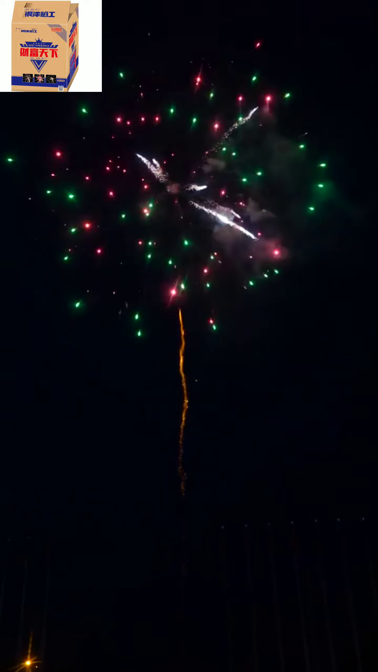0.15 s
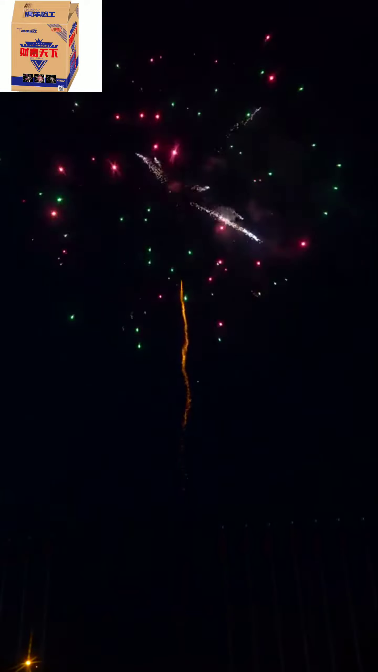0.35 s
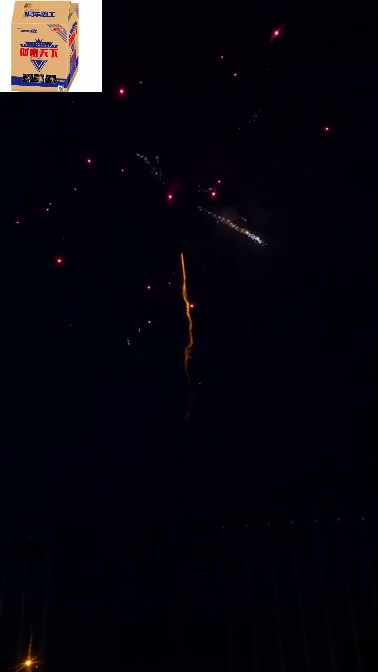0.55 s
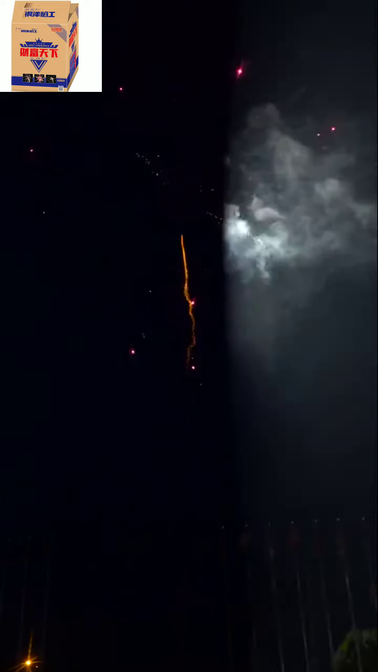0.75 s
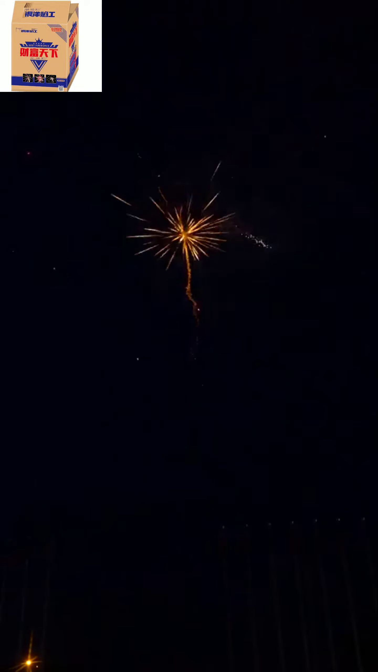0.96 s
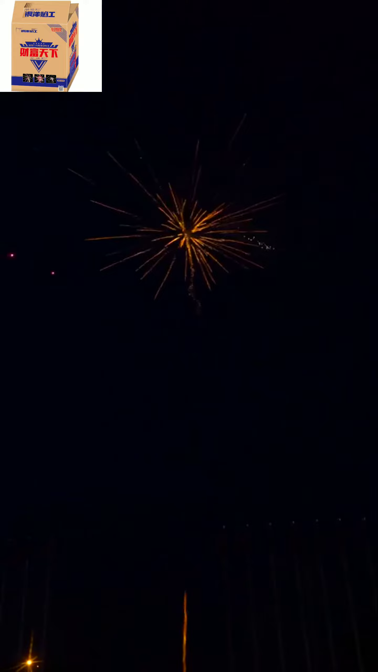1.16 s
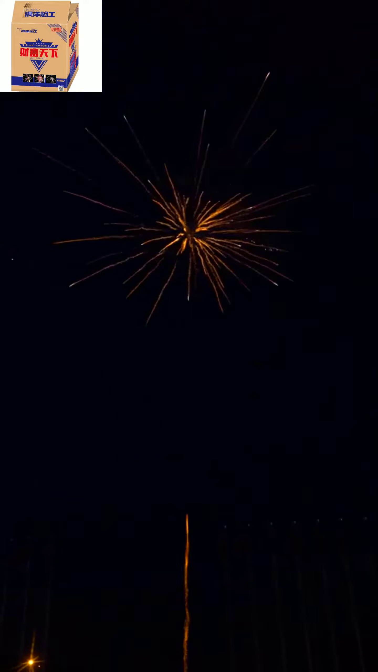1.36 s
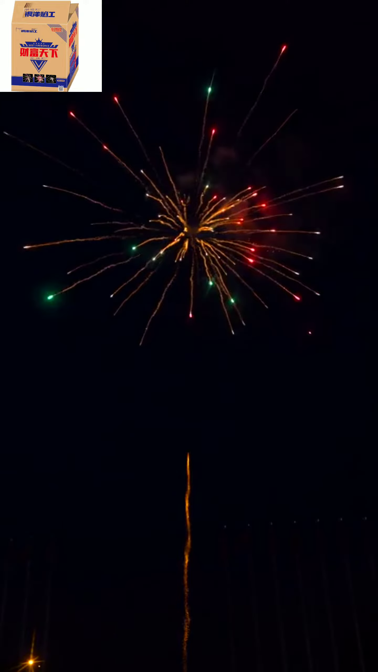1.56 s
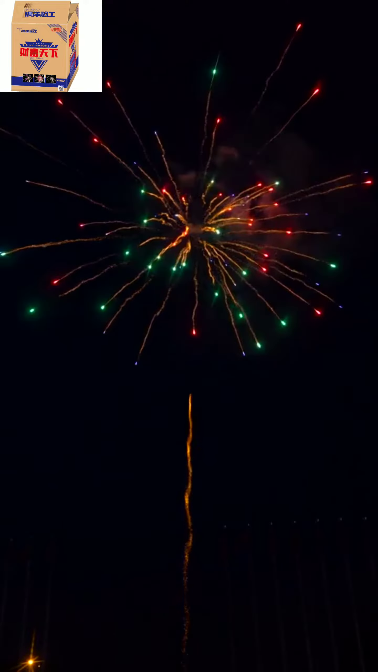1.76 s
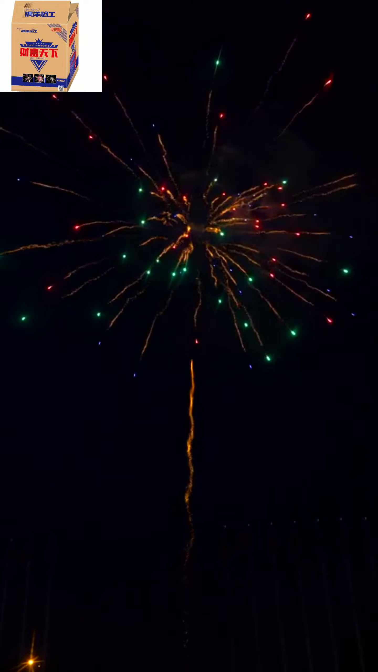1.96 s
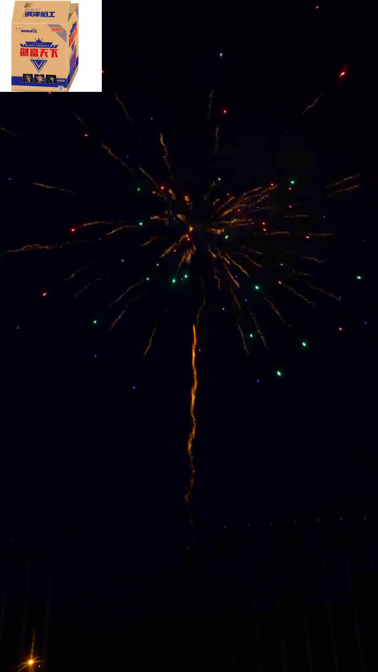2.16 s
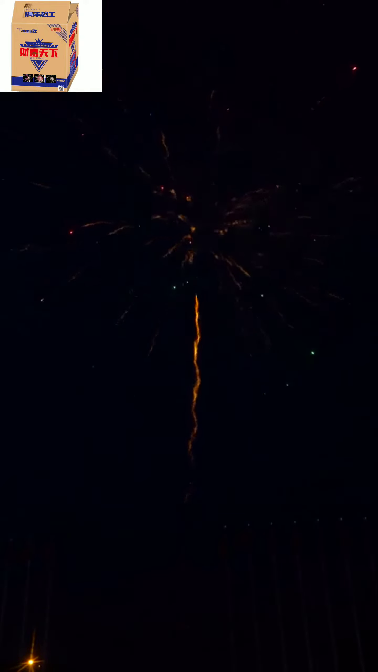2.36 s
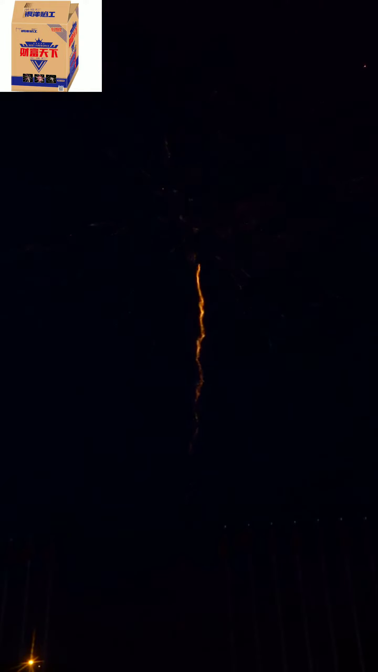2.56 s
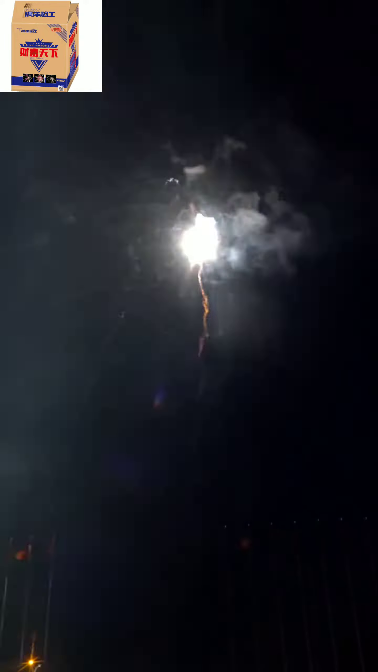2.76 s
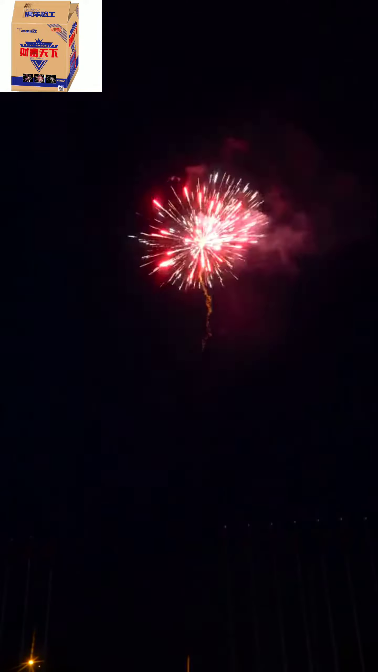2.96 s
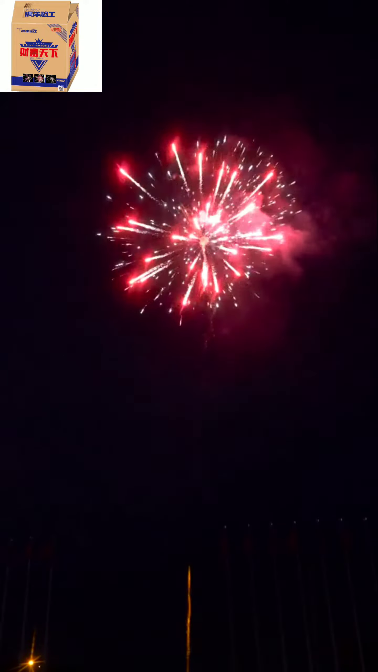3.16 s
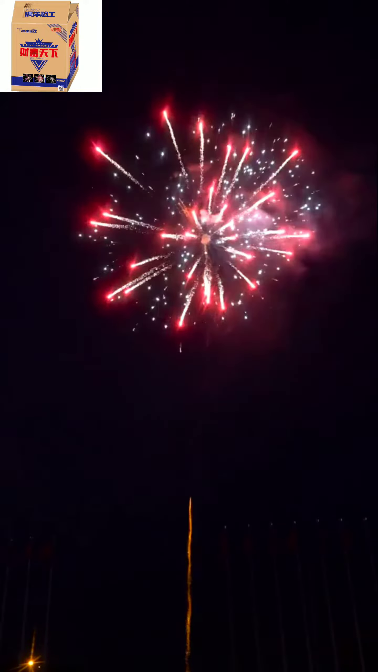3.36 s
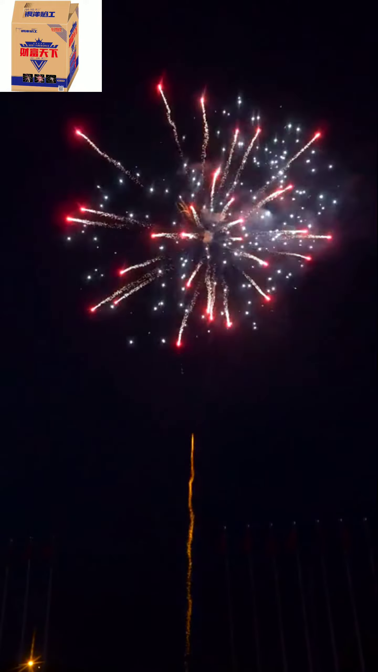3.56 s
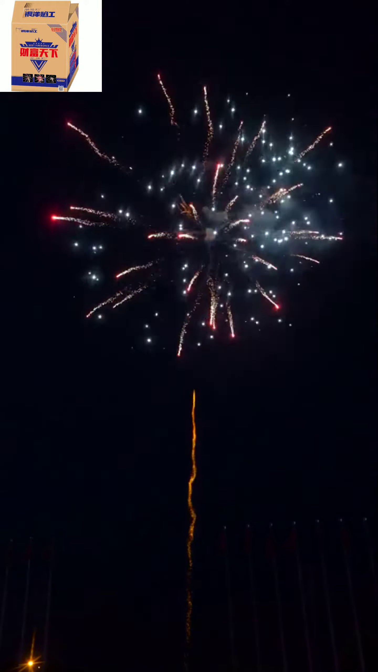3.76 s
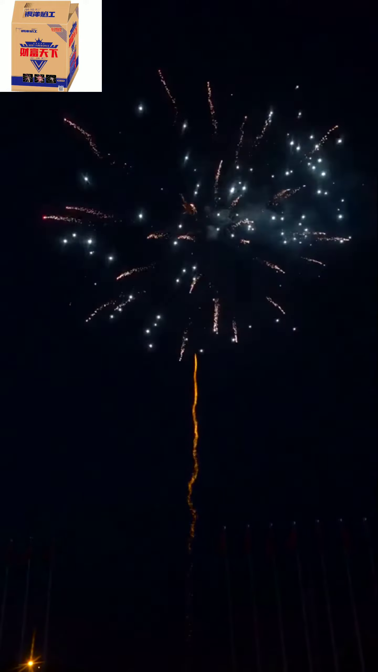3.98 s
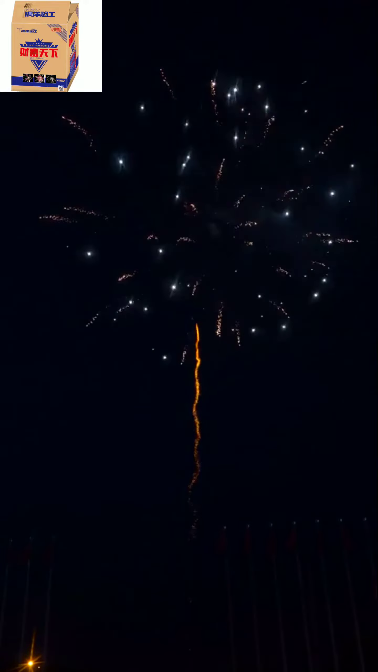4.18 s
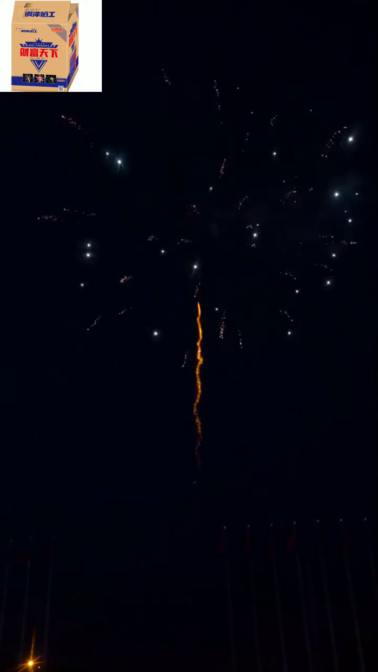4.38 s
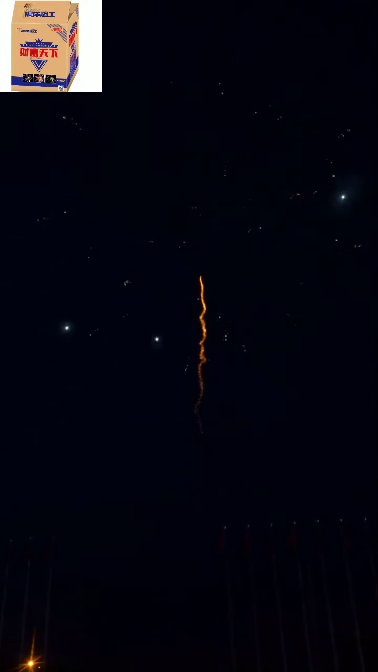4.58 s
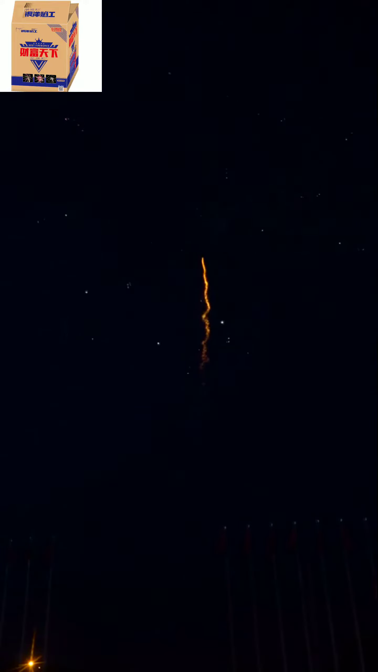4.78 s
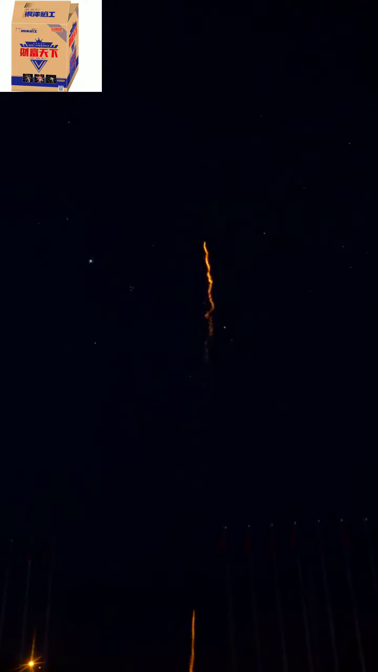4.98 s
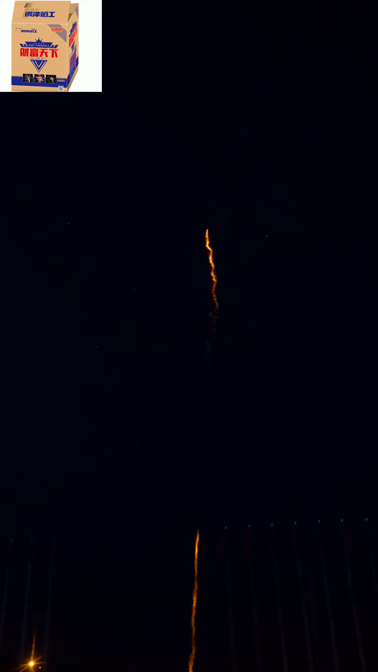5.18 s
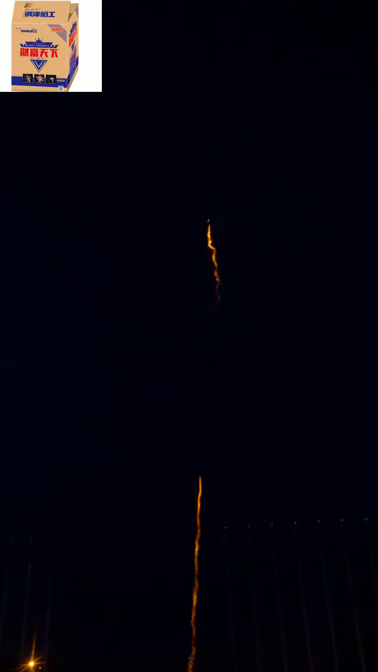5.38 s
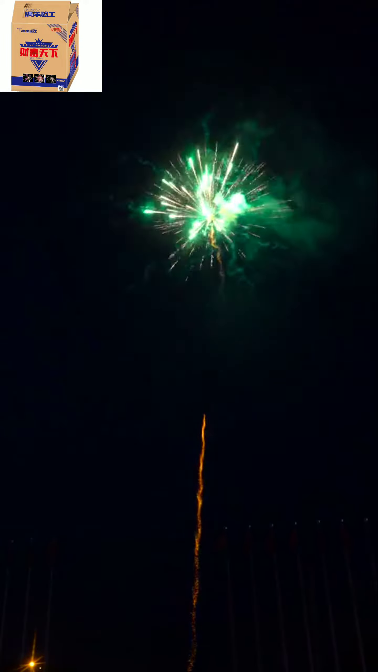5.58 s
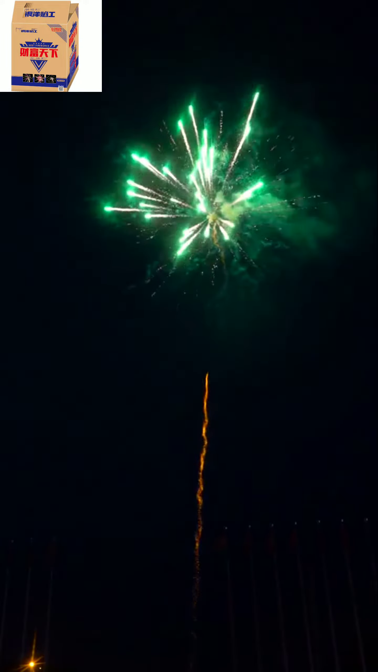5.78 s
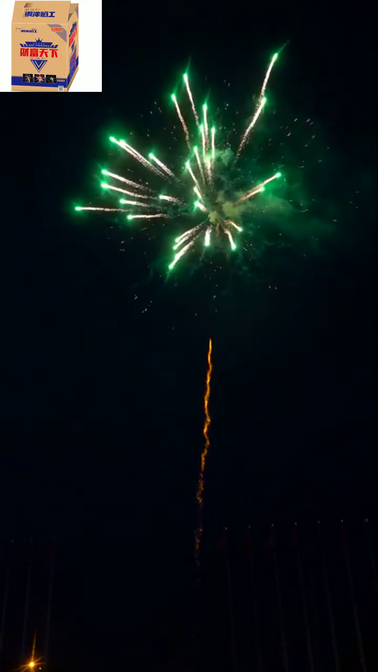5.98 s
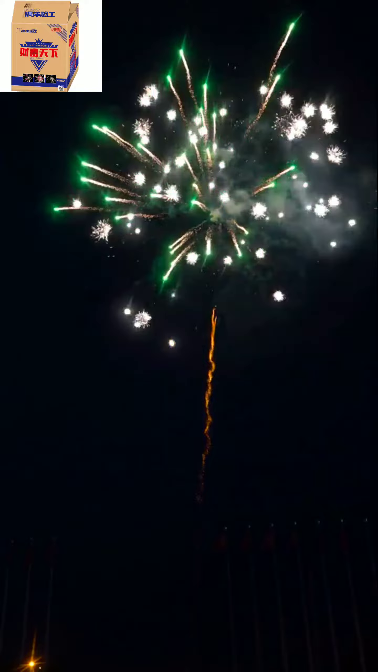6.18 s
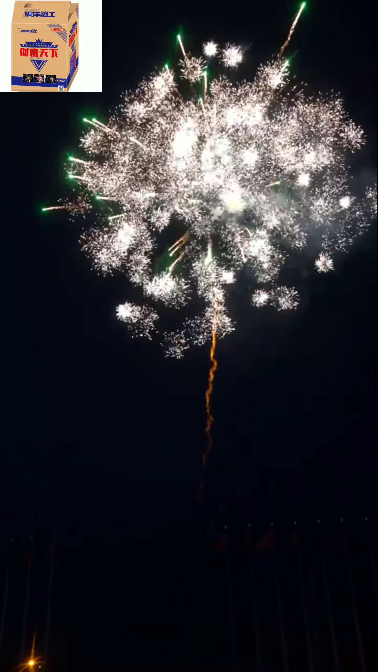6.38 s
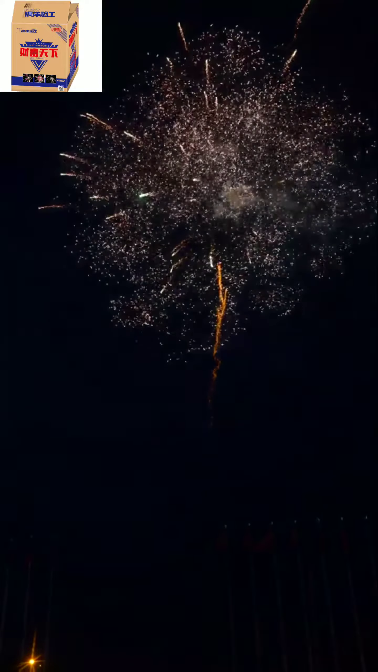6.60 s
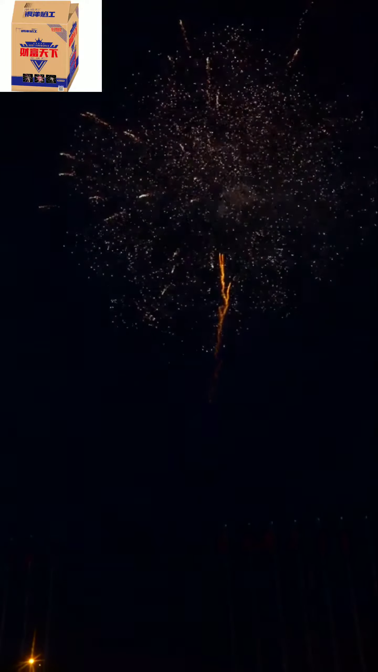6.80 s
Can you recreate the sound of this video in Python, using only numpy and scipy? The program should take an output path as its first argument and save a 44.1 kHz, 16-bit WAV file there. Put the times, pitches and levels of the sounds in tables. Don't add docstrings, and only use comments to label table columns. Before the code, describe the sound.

Three firework shells launch and burst at night, each double bang slapping off house fronts and rolling away, the last ending in crackling stars.

```python
import sys
import numpy as np
from scipy import signal
from scipy.fft import rfft, irfft, next_fast_len
from scipy.io import wavfile
from scipy.ndimage import uniform_filter1d

SR = 44100
rng = np.random.default_rng(int(sys.argv[2]) if len(sys.argv) > 2 else 0)


def store_wav(level_fs):
    pcm = np.round(np.clip(np.atleast_2d(level_fs), -1, 1) * 32767)
    wavfile.write(sys.argv[1], SR, pcm.T.astype(np.int16))


def volts_from_decibels(level):
    exponent = np.asarray(level, float) / 20
    return 10 ** exponent


N = 301628
M = next_fast_len(N)
T, HZ = np.arange(N) / SR, np.fft.rfftfreq(M, 1 / SR)

# (time [s], firing rate [Hz], level [dB])
ENGINE = [(0, 76.5, -38), (1.05, 79, -35.5), (2, 82, -39), (2.97, 84.6, -38), (4.2, 88, -40),
          (4.55, 88.9, -49), (4.7, 89.4, -40), (5.35, 91.2, -39), (5.55, 91.6, -48), (6.84, 93, -43)]
# (frequency [Hz], density [dB per Hz])
NIGHT_COLOUR = [(12, -43), (20, -33), (38, -19), (62, 2), (92, -16.5), (129, 6.5), (307, -10), (479, -25),
                (591, -22), (1230, -19), (5080, -46.5), (8150, -43.5), (10600, -69.5), (13800, -110),
                (22000, -120)]
# (frequency [Hz], side against mid [dB])
WIDTH = [(60, -33), (125, -44.5), (250, -21.5), (500, -9), (1000, -8.5), (2000, -1.5), (4000, 1),
         (8000, -9), (10500, -24)]
# (low edge [Hz], high edge [Hz])
ROLL_BANDS = [(100, 450), (450, 1700), (1700, 5000), (5000, 10000)]
# (frequency [Hz], density [dB per Hz])
ROLL_COLOUR = [(15, -45), (25, -30.5), (41, -29.5), (103, -8.5), (270, -3.5), (483, -14), (521, -10.5),
               (689, -7.5), (933, -10), (1260, -15), (2630, -31.5), (7440, -44), (8880, -48.5), (9820, -63),
               (10600, -75), (13800, -99), (22000, -120)]
# (time [s], strength [dB], brightness [dB], stretch [ratio])
BURST_ROLLS = [
    (-0.47, 1, -0.5, 1.094),
    (1.0916, -0.5, 0.14, 0.99),
    (3.0739, 0.73, 0.3, 0.97),
    (5.7036, 0.72, 1.15, 0.95),
]
# (time [s], strength [dB], brightness [dB], stretch [ratio])
LIFT_ROLLS = [
    (1.0678, -0.5, 3.5, 0.63),
    (3.0001, -1, 1, 1.01),
    (4.9582, -0.5, 2.5, 0.89),
]
# (age [s], boom [dB], left-right [dB])
BURST_ECHO = [(0, -26.5, -1), (0.043, -14, 1.5), (0.085, -17.5, -3), (0.122, -15, -3.5), (0.23, -15, -3),
              (0.31, -18.5, -2), (0.45, -24.5, -1.5), (0.749, -30, 0), (1.3, -43, -0.5)]
# (age [s], boom [dB], left-right [dB])
LIFT_ECHO = [(0, -27.5, 8.5), (0.055, -27.5, 6.5), (0.1, -27.5, -4.5), (0.14, -25.5, -5), (0.2, -24, -5),
             (0.31, -30.5, -3.5), (0.4, -34.5, -1.5), (0.5, -37, 0), (0.75, -41, 0.5)]
# (share [dB], extra while young [dB], dulling [dB/s], share of brightness [ratio], far murmur [dB])
BURST_AGEING = [
    (-0.35, -2.6, 0.6, 0.37, -42),
    (-12, 4.5, 1, 0.85, -53),
    (-19.5, 8, -2.9, 0.9, -64.5),
    (-21.5, 6, 15.5, 1.7, -90.5),
]
# (share [dB], extra while young [dB], dulling [dB/s])
LIFT_AGEING = [
    (0.4, 0, 3.2),
    (-10.5, 4.5, -0.7),
    (-14, 9.5, -3.5),
    (-20.5, -3.5, 19.5),
]
# (delay [s], peak [dB], centre [Hz], left-right [dB], t60 [s])
WALLS = [(0.031, -21.5, 3330, 9, 0.022), (0.058, -13.5, 6200, -12, 0.021), (0.087, -17.5, 7260, -6, 0.022),
         (0.1015, -20.5, 6500, -14, 0.014), (0.129, -19, 4600, 9, 0.014), (0.155, -21, 2680, 20, 0.02),
         (0.2745, -17.5, 670, 13, 0.03)]
# (time [s], peak [dB], centre [Hz], left-right [dB], t60 [s])
STRAYS = [(1.0588, -18, 700, 6, 0.0059), (1.113, -22, 690, 8, 0.039), (2.516, -43.5, 1770, 12, 0.088),
          (2.85, -48, 5000, -5, 0.022), (2.969, -29.5, 800, 5, 0.036), (3.066, -15, 1300, 6, .02),
          (3.6457, -20, 4300, -6, 0.0057), (3.651, -20, 3000, 9, 0.0039), (4.607, -34.5, 1060, 9, 0.049),
          (4.951, -11, 600, 3, 0.005), (5.038, -18, 890, 0, 0.03), (5.069, -15.5, 900, -6, 0.061),
          (5.085, -20, 1490, 0, 0.028), (5.729, -18, 705, -6, 0.027), (5.999, -15, 910, 1, .02)]
# (time [s], peak [dB], pitch [Hz], length [s])
THUDS = [(.833, -22, 260, .012), (6.04, -15, 240, .04), (2.315, -24, 170, .015), (4.6075, -20, 230, .008),
         (5.058, -17, 140, .02), (5.086, -14, 150, .016), (5.1215, -12, 150, .02), (5.16, -17, 125, .04),
         (5.21, -21, 120, .04)]
# (time [s], peak [dB])
STARS = [(6.3892, -13), (6.4201, -12), (6.422, -14), (6.4243, -20), (6.4354, -13), (6.4455, -11),
         (6.4479, -15), (6.4491, -15), (6.4588, -10), (6.4603, -21), (6.4669, -19), (6.4703, -11),
         (6.4727, -18), (6.4842, -15), (6.4867, -11), (6.4896, -11)]
# (time [s], level [dB], rate [stars/s], echo level [dB])
SWARM = [(6.49, -17.5, 320, -18.5), (6.55, -17, 770, -21), (6.6, -20, 770, -16.5),
         (6.639, -32.5, 1160, -16), (6.67, -29, 1500, -21.5), (6.71, -21, 310, -23), (6.76, -29, 330, -23),
         (6.84, -30, 150, -27.5)]
# (frequency [Hz], density [dB per Hz])
STAR_COLOUR = [(88, -33.5), (150, -12), (429, 4), (478, 13), (571, 4.5), (974, 10), (1390, 5.5), (6440, -8),
               (9700, -23), (10600, -80), (13800, -110), (22000, -120)]
# (time [s], peak [dB], left-right [dB], thud t60 [s], near-wall slap [dB])
LIFTS = [
    (1.068, -8.5, 3.5, 0.082, -23),
    (3.0004, -10, 1, 0.14, -8),
    (4.9579, -8.5, -2.5, 0.051, -10),
]
# (time [s], peak [dB], left-right [dB], ground bounce [dB])
BURSTS = [
    (1.0916, -4.5, -2, 1.5),
    (3.0739, -4.5, -2, 2.5),
    (5.7036, -3.5, -2, 1),
]
# (frequency [Hz], gain [dB])
MIC = [(20, -25), (70, -3.5), (130, 1), (2500, 2), (5300, -1.5), (7700, 2.5), (9000, -1.5), (9900, -9.5),
       (10600, -50), (22050, -101)]

DUCK_DB, DUCK_S = 22.5, 0.16
CLAMP_DB, CLAMP_AT_S, CLAMP_S = 7.5, 0.015, 0.0057
YOUNG_S, LATE_DB_PER_S = 0.025, 26.5
NEAR_WALL_S, NEAR_WALL_T60_S, NEAR_BOOM_DB = 0.0322, 0.014, 2
CRACK_GAIN, HISS_DB = 1.17, -32.5
KERB_GAIN, KERB_S = 0.41, 0.00019
BLAST = 3000


def evened(x):
    return x / np.sqrt(np.mean(x ** 2) + 1e-20)


def read(points, hz):
    f, value = np.transpose(points)
    return np.interp(np.log(hz + 1), np.log(f + 1), value)


def add(mix, s, sound, pan_db):
    part = mix[:, round(s * SR):][:, :len(sound)]
    part += sound[:part.shape[1]] * volts_from_decibels([[pan_db / 2], [-pan_db / 2]])


def spread(mid, side):
    side = side * volts_from_decibels(read(WIDTH, HZ))
    lag_samples = 2.5 * np.exp(-(HZ / 3500) ** 2)
    late = np.exp(-2j * np.pi * HZ * lag_samples / SR)
    return np.array([mid + side, (mid - side) * late])


def causal(points):
    gain = volts_from_decibels(read(points, abs(np.fft.fftfreq(4096, 1 / SR))))
    phased = np.conj(signal.hilbert(np.log(gain + 1e-5)))
    click = np.fft.ifft(np.exp(phased)).real[:1024]
    return click / np.linalg.norm(click)


def grit(shape, t60_s, dull):
    spray = signal.lfilter([1], [1, -np.clip(dull, 0, .95)], rng.standard_normal(shape))
    return spray * volts_from_decibels(-60 * T[:shape[-1]] / t60_s)


def blow(start_hz, end_hz, sag_s, t60_s):
    t = T[:BLAST]
    turns = end_hz * t + (start_hz - end_hz) * sag_s * (1 - np.exp(-t / sag_s))
    return np.sin(2 * np.pi * turns) * volts_from_decibels(-60 * t / t60_s)


def shock(s):
    u = T[:BLAST] / s
    return (1 - u) * np.exp(-u)


def front(s):
    dip = np.exp(-.5 * ((T[:BLAST] - .00012) / .00005) ** 2)
    return np.roll(shock(s), 9) - 0.55 * dip


def hollow(x):
    return x - KERB_GAIN * np.roll(x, round(KERB_S * SR), axis=-1)


def thud(db, hz, length_s):
    t = T[:round(length_s * SR)]
    return -volts_from_decibels(db) * np.sin(2 * np.pi * hz * t) * signal.windows.tukey(len(t), .6)


def night():
    s, hz, db = np.transpose(ENGINE)
    waver_db = -1.5 + 1.5 * np.interp(T, np.linspace(0, T[-1], 60), rng.standard_normal(60))
    ducks = [(T >= at) * np.exp(-abs(T - at) / DUCK_S) for at, *_ in LIFTS + BURSTS]
    duck_db = uniform_filter1d(DUCK_DB * np.max(ducks, 0), size=1500)
    level = np.sqrt(2) * volts_from_decibels(np.interp(T, s, db) + waver_db - duck_db)
    note = level * np.sin(2 * np.pi * np.cumsum(np.interp(T, s, hz)) / SR)
    colour = volts_from_decibels(read(NIGHT_COLOUR, HZ))
    wash = irfft(spread(*rfft(rng.standard_normal((2, N)), M)) * colour, M)[:, :N]
    return note + volts_from_decibels(-42.5) * evened(wash)


def answer(blasts, echo, ageing):
    age_s, boom_db, pan_db = np.transpose(echo)
    power, lean = np.zeros((len(ageing), N)), np.zeros(N)
    for s, db, bright_db, stretch in blasts:
        age = np.maximum(T - s, 0) / stretch
        level_db = db + np.interp(age, age_s, boom_db) - LATE_DB_PER_S * np.maximum(age - age_s[-1], 0)
        level_db -= CLAMP_DB * np.exp(-((age - CLAMP_AT_S) / CLAMP_S) ** 2)
        for k, (share_db, young_db, dull_db_per_s, *_) in enumerate(ageing):
            band_db = level_db + share_db + young_db * np.exp(-age / YOUNG_S)
            band_db += BURST_AGEING[k][3] * bright_db - dull_db_per_s * age
            power[k] += (T >= s) * volts_from_decibels(band_db) ** 2
        lean += (T >= s) * volts_from_decibels(level_db) ** 2 * np.interp(age, age_s, pan_db)
    return power, lean


def roll():
    hits = rng.standard_normal((2, N))
    large = volts_from_decibels(4.6 * np.minimum(rng.exponential(1, (2, N)), 2.8))
    hits *= 0.8 + large * (rng.random((2, N)) < 1500 / SR)
    field = spread(*rfft(hits, M)) * volts_from_decibels(read(ROLL_COLOUR, HZ))
    sky, sky_lean = answer(BURST_ROLLS, BURST_ECHO, BURST_AGEING)
    ground, ground_lean = answer(LIFT_ROLLS, LIFT_ECHO, LIFT_AGEING)
    murmur = volts_from_decibels(np.transpose(BURST_AGEING)[-1])[:, None] ** 2
    power = sky + ground + murmur
    centres_hz = [np.sqrt(lo * hi) for lo, hi in ROLL_BANDS]
    out, common = 0, rng.standard_normal(200)
    for k, (lo, hi) in enumerate(ROLL_BANDS):
        inside = (HZ > lo) & (HZ < hi)
        band_rms = np.sqrt(2 * np.sum(abs(field.mean(0)[inside]) ** 2)) / N
        share = np.interp(np.log(HZ + 1), np.log(centres_hz), np.arange(len(centres_hz)) == k)
        lumps = np.interp(T, np.linspace(0, T[-1], 200), common + 0.87 * rng.standard_normal(200))
        band = irfft(field * share, M)[:, :N] / band_rms
        out = out + band * np.sqrt(power[k]) * volts_from_decibels(1.1 * lumps)
    return out * volts_from_decibels(np.outer([.5, -.5], (sky_lean + ground_lean) / power[0]))


def slaps():
    out, t = np.zeros((2, N)), T[:2000]
    burst_walls = [(burst[0] + delay_s, *wall) for burst in BURSTS for delay_s, *wall in WALLS]
    for s, db, hz, pan_db, t60_s in STRAYS + burst_walls:
        b, a = signal.iirpeak(min(hz, 9500), .8, SR)
        smear = signal.filtfilt(b, a, signal.lfilter(b, a, rng.standard_normal(2000)))
        smear *= volts_from_decibels(-60 * t / max(t60_s, .003)) * np.minimum(t / (0.037 * t60_s), 1)
        add(out, s, volts_from_decibels(db) * smear / abs(smear).max(), pan_db)
    return out


def far_thuds():
    out = np.zeros((2, N))
    for s, db, hz, length_s in THUDS:
        add(out, s, thud(db, hz, length_s), 0)
    return out


def crackle():
    s, db, per_s, echo_db = np.transpose(SWARM)
    rate = np.interp(T, s, per_s, left=0)
    rate *= volts_from_decibels(3.4 * evened(uniform_filter1d(rng.standard_normal(N), 500)))
    size = volts_from_decibels(2.6 * np.minimum(rng.exponential(1, N), 3)) * (rng.random(N) < rate / SR)
    size *= 1.3 * volts_from_decibels(np.interp(T, s, db))
    for at_s, peak_db in STARS:
        size[round(at_s * SR)] = volts_from_decibels(peak_db + 3.0)
    height, sky, ground = rng.integers(0, 4, N), size * volts_from_decibels([[-3.0], [2.5]]), 0
    for h in range(4):
        ground = ground + np.roll(size * (height == h), round((.0052 + 0.00022 * h) * SR))
    sky[0] = np.roll(sky[0], 3)
    ground = signal.lfilter([.6], [1, -.4], ground)
    both = sky + ground * volts_from_decibels([[3.5], [-6.0]])
    pops = signal.oaconvolve(both, front(0.00035)[None, :400], axes=1)[:, :N]
    decay = volts_from_decibels(-120 * T[None, :900] / 0.044)
    settle = np.sqrt(abs(signal.oaconvolve(both ** 2, decay, axes=1)[:, :N]))
    pops += volts_from_decibels(-20.0) * settle * signal.lfilter([1], [1, -.5], rng.standard_normal((2, N)))
    spray = rng.standard_normal((2, N)) * volts_from_decibels(3.0 * np.minimum(rng.exponential(1, (2, N)), 4))
    blur = evened(signal.oaconvolve(spray, causal(STAR_COLOUR)[None], axes=1)[:, :N])
    return pops + blur * volts_from_decibels(np.interp(T, [6.415, *s], [-60, *echo_db], left=-120))


def lift_crack(out, s, db, pan_db, t60_s):
    crack = hollow(signal.lfilter([.4], [1, -.6], front(0.0006)))
    add(out, s, volts_from_decibels(db) * (blow(260, 175, 0.00096, t60_s) + CRACK_GAIN * crack), pan_db)
    ragged = CRACK_GAIN * hollow(grit((2, BLAST), 0.014, 0.74))
    out[:, round(s * SR):][:, :BLAST] += volts_from_decibels(db - 11.5) * ragged


def lifts():
    out = np.zeros((2, N))
    lead = round(.0095 * SR)
    for s, db, pan_db, t60_s, wall_db in LIFTS:
        lift_crack(out, s, db, pan_db, t60_s)
        lift_crack(out, s + NEAR_WALL_S, wall_db, pan_db, NEAR_WALL_T60_S)
        add(out, s + NEAR_WALL_S + .0015, thud(wall_db + NEAR_BOOM_DB, 155, .0098), 0)
        hiss = hollow(grit((lead,), 0.41, 1.0)) * np.minimum(T[:lead] / 0.0026, 1)
        add(out, s - lead / SR, volts_from_decibels(HISS_DB) * hiss, pan_db)
    return out


def bursts():
    out = np.zeros((2, N))
    clamp = np.interp(T[:BLAST], [.0082, .0105], [1, .2])
    for s, db, pan_db, ground_db in BURSTS:
        push = 1.25 * np.roll(blow(480, 170, .003, .03), 8)
        ground_push = 1.2 * np.roll(blow(380, 170, .003, .02), 8)
        bounce = np.roll(ground_push + .3 * front(.0003), round(.0051 * SR))
        add(out, s, volts_from_decibels(db) * clamp * (push + 0.29 * front(0.0004)), pan_db)
        add(out, s, volts_from_decibels(db + ground_db) * clamp * bounce, -pan_db)
        out[:, round(s * SR):][:, :BLAST] += volts_from_decibels(db - 17.5) * grit((2, BLAST), 0.038, 0.81)
    return out


def scene():
    click = causal(MIC)
    click = click / abs(rfft(click)).max()
    blasts = slaps() + far_thuds() + crackle() + lifts() + bursts()
    close = signal.oaconvolve(blasts, click[None], axes=1)[:, :N]
    return night() + roll() + close


def low_pass(x):
    return signal.sosfilt(signal.butter(12, 10770, fs=SR, output="sos"), x)


def record(dry):
    limited = 1.05 * np.tanh(dry / 1.05)
    edge = signal.firwin(255, 10300, window=("kaiser", 9), fs=SR)
    mix = signal.oaconvolve(limited, edge[None], "same") * np.minimum(np.arange(N) / 128, 1)
    return low_pass(mix)


dry = scene()
out = record(dry)
store_wav(out)
```